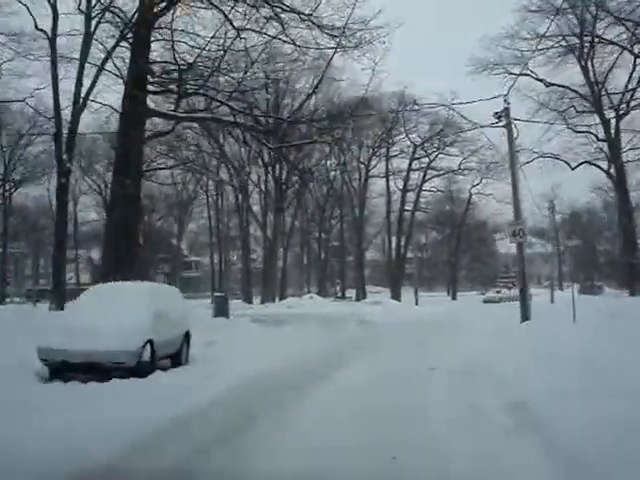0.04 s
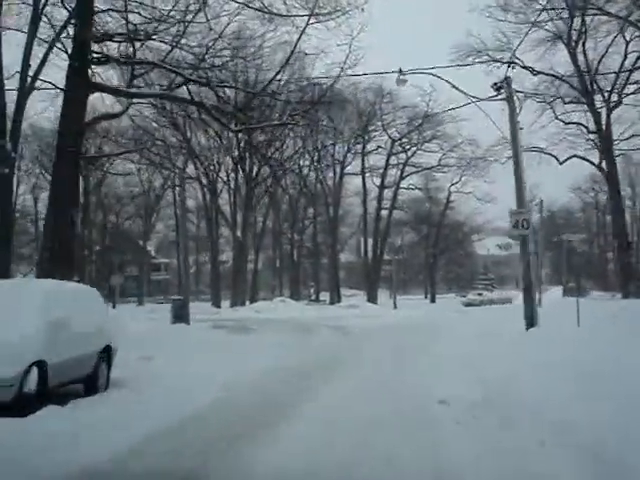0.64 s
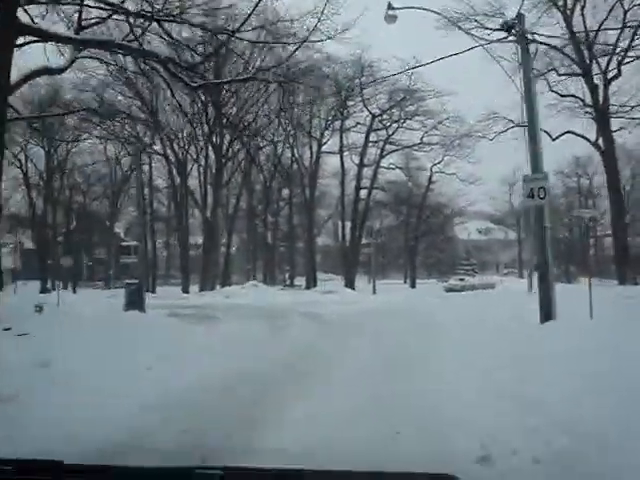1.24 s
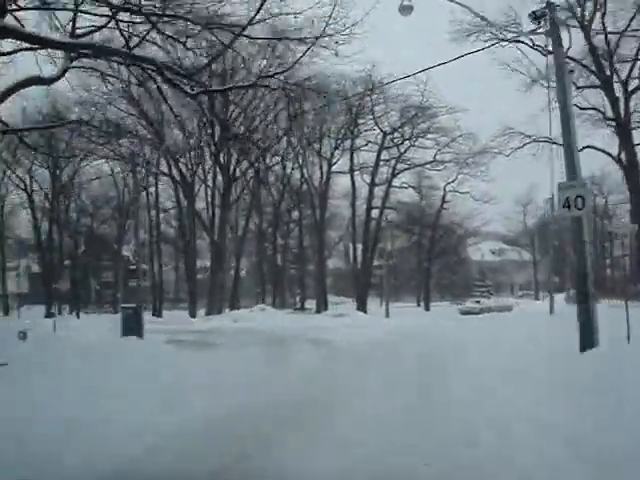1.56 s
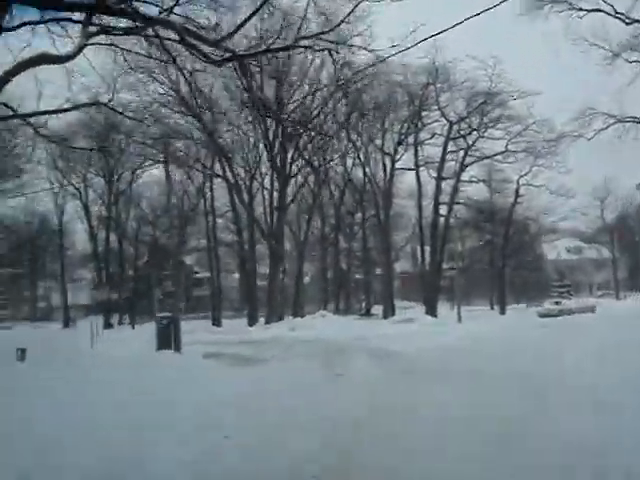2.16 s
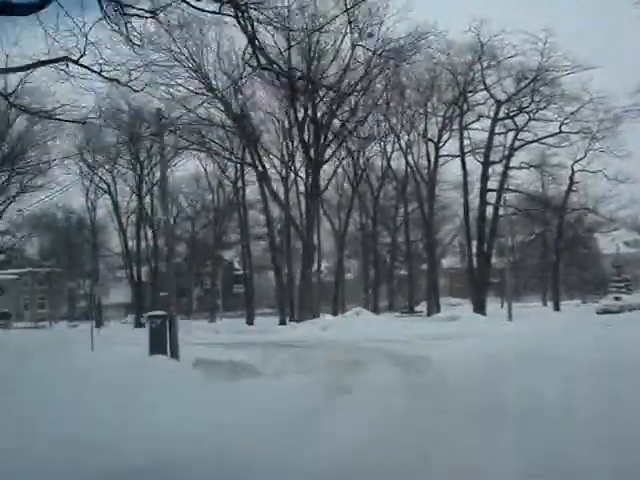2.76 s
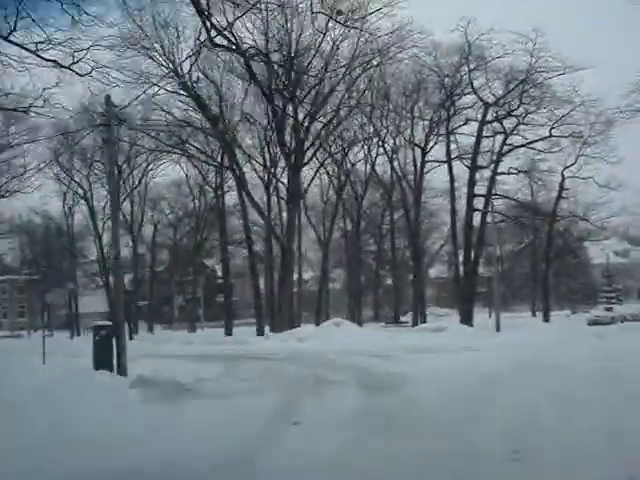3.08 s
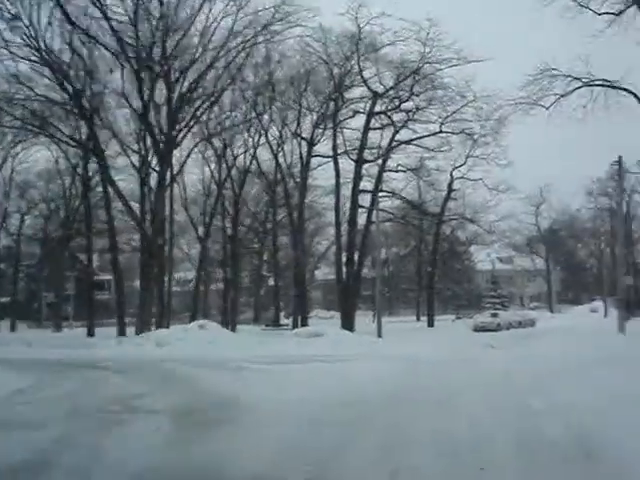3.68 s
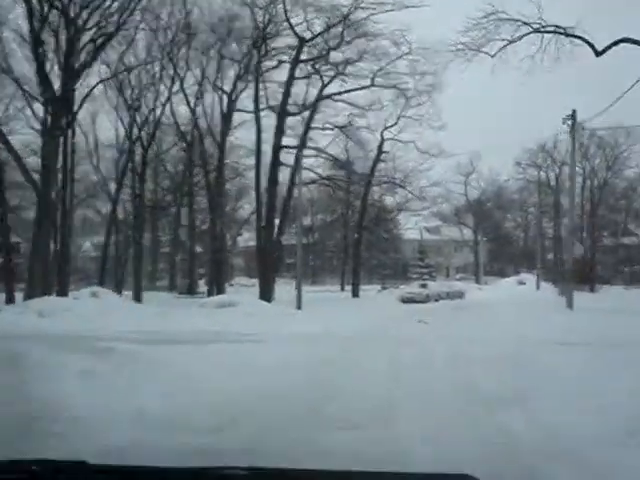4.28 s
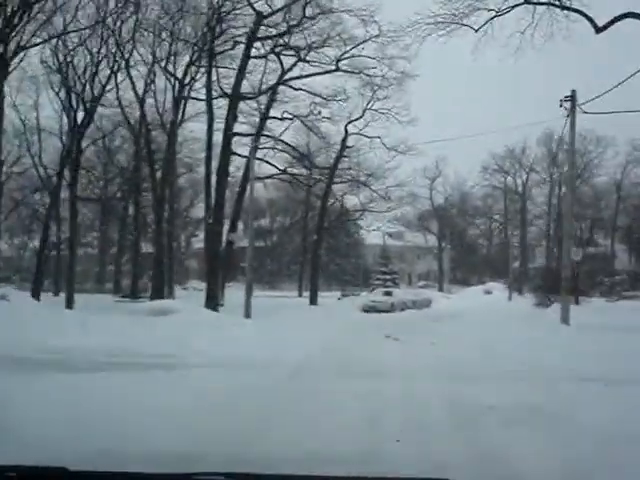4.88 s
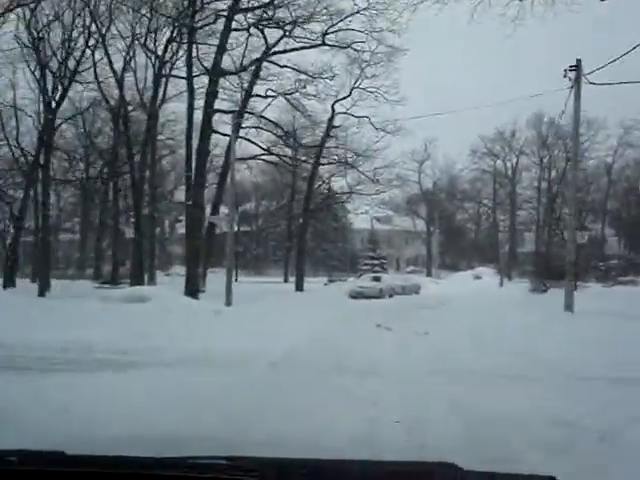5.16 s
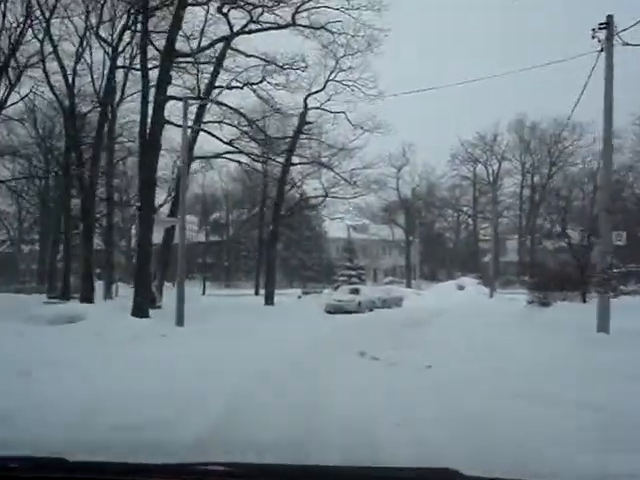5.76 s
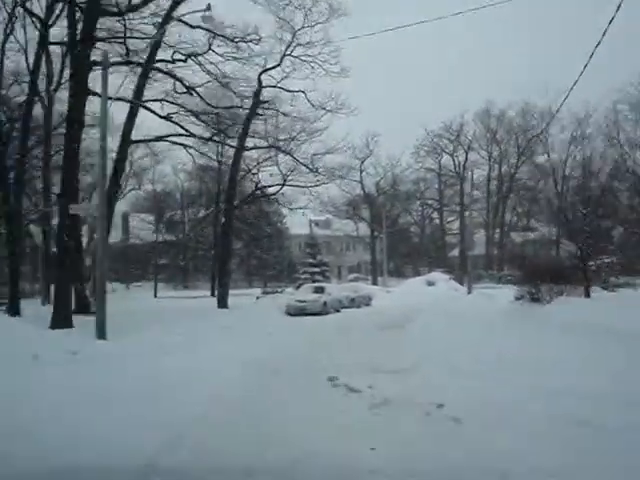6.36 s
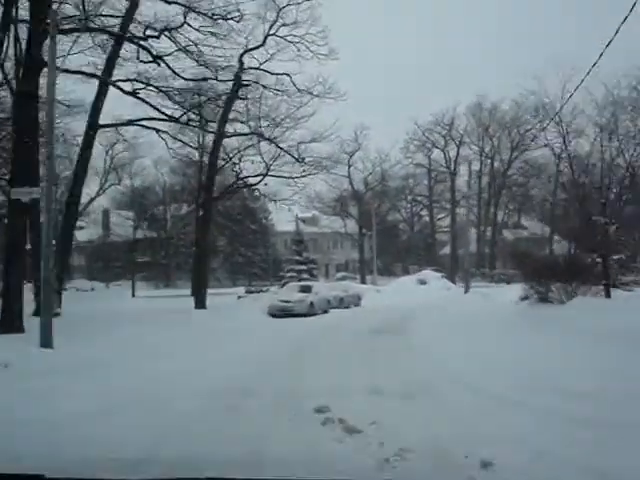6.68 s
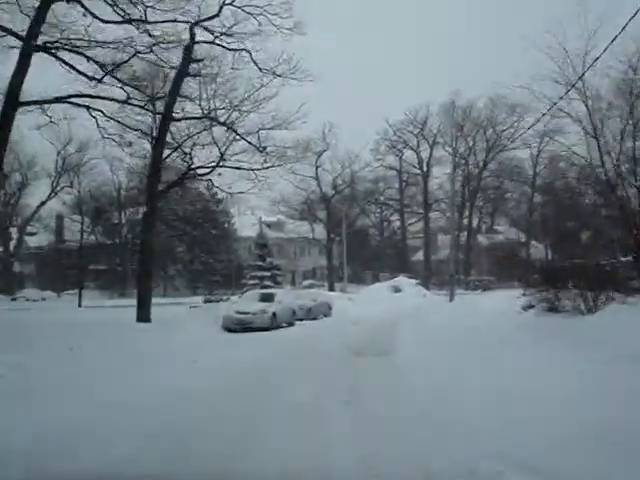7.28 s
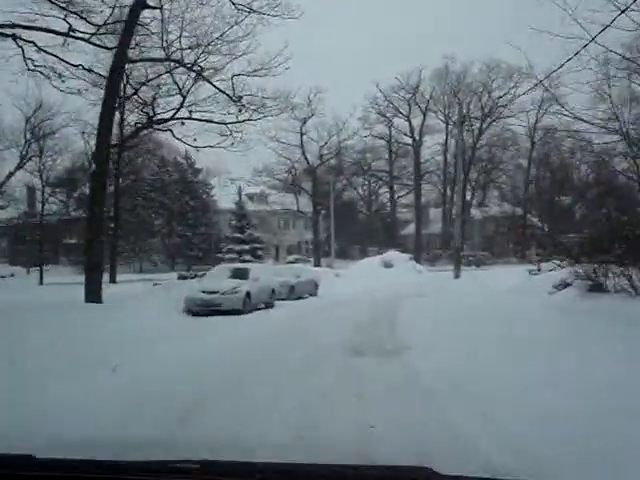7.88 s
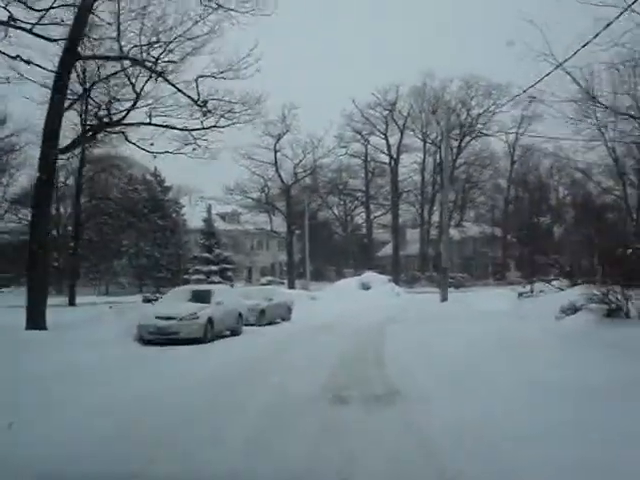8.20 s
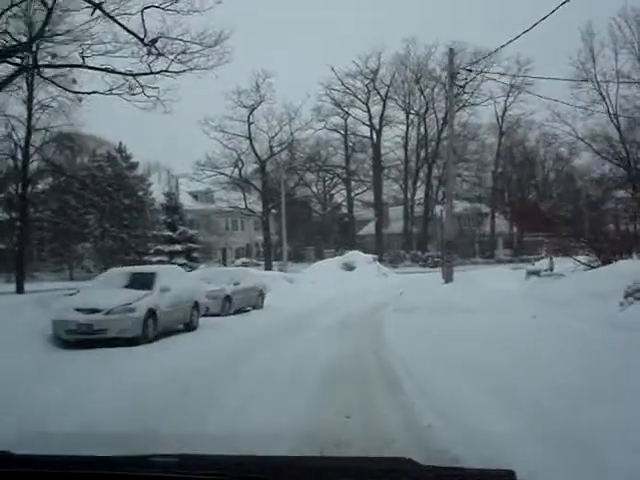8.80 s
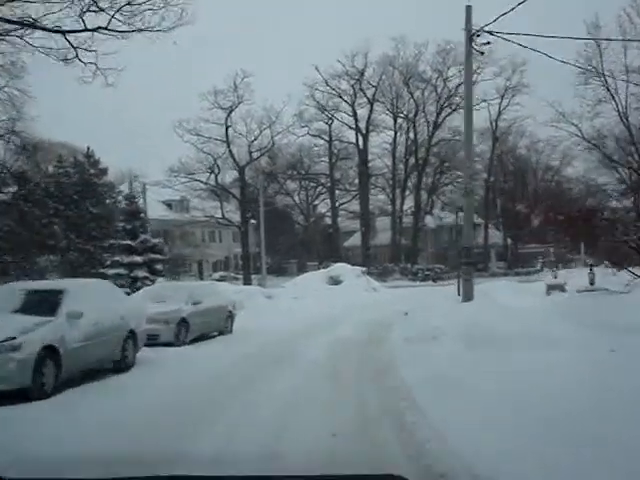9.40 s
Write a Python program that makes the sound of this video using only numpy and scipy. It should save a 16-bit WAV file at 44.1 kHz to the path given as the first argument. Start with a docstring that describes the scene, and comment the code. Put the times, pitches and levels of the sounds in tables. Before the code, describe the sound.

Heard from behind the windscreen, a car drives over packed snow with a continuous low tyre rumble, faint crunch and heater hiss. The engine's hum dips, rises as it pulls through a bend, then falls away as the driver eases off. Small plastic trim pieces tick throughout. Several runs of icy ruts knock the suspension, shake the body and set the trim rattling, with short gritty swishes of loose snow in between.

```python
"""Inside a car rolling through a bend on a snow-covered street.
The six-cylinder engine hums through the cabin's resonances as the driver eases off, pulls away
and eases off again. Tyres rumble and crunch on packed snow, their hiss merging with the heater fan's.
Loose trim ticks; icy ruts thump the suspension, shake the body and rattle the trim.
Loose snow sprays in the bend, and patches of it swish under the tyres."""
import sys
import numpy as np
from scipy.fft import rfft, irfft, next_fast_len
from scipy.io import wavfile
from scipy.ndimage import map_coordinates

SR = 44100
rng = np.random.default_rng(int(sys.argv[2]) if len(sys.argv) > 2 else 0)


def unload_wav(signal):
    """Save mono or channel-first audio to the path in sys.argv[1] as 16-bit WAV at rate SR, clipped to [-1, 1]."""
    wavfile.write(
        sys.argv[1],
        SR,
        np.round(np.clip(np.atleast_2d(signal).T, -1, 1) * 32767).astype(np.int16),
    )


N = 425124
TIME_S = np.arange(N) / SR


def amp(db):
    return 10 ** (np.asarray(db) / 20)


def unit_rms(x):
    return x / np.sqrt(np.mean(x ** 2) + 1e-20)


def curve(rows, t=TIME_S):
    """(t/s, value) rows interpolated at t."""
    return np.interp(t, *np.transpose(rows))


def wobble(rate_hz):
    """Smooth random curve, rate_hz knots a second."""
    knots = rng.standard_normal(int(N * rate_hz / SR) + 4)
    return map_coordinates(knots, [TIME_S * rate_hz])


def filtered(x, response):
    """x through the frequency response response(hz)."""
    size = next_fast_len(len(x) + SR // 2)
    return irfft(rfft(x, size) * response(np.fft.rfftfreq(size, 1 / SR)), size)[:len(x)]


def noise(spectrum):
    """Noise of rms 1, shaped by (f/Hz, level/dB) rows on a log frequency axis."""
    knot_hz, db = np.transpose(spectrum)
    response = lambda hz: amp(np.interp(np.log(hz + 1), np.log(knot_hz + 1), db))
    return unit_rms(filtered(rng.standard_normal(N), response))


def resonance(hz, centre_hz, width_hz):
    """Causal band-pass, gain 1 at its centre."""
    return 1j * hz * width_hz / (centre_hz ** 2 - hz ** 2 + 1j * hz * width_hz)


def add(track, start_s, sound):
    part = track[max(round(start_s * SR), 0):][:len(sound)]
    part += sound[:len(part)]


def fade(t, attack_s, t60_s):
    """Quick rise, exponential decay."""
    return (1 - np.exp(-t / attack_s)) * np.exp(-np.log(1000) * t / t60_s)


# engine load: t/s, level/dB
ENGINE_LOAD = [(0, -38), (2.2, -39), (2.6, -41), (3.7, -38.5), (4.8, -38.5), (6.6, -38), (7.5, -47.5),
               (9.64, -41)]
# exhaust pulse rate of one three-cylinder bank: t/s, f/Hz
PULSE_RATE = [(0, 30.3), (.5, 30.9), (1.27, 30.95), (2.29, 31.5), (2.71, 28.7), (3.28, 28.5), (3.6, 33.4),
              (4.49, 37.2), (4.87, 36), (6.1, 36.5), (6.46, 33.2), (6.8, 32.3), (7.8, 25.5), (8.4, 22.7),
              (9.64, 22.1)]
# engine-to-cabin resonances: f/Hz, width/Hz, level/dB
CABIN_PATHS = [(72.6, 15, -13.5), (96.3, 15, -2), (101.8, 12.4, 1), (117, 20, -0.5), (132.7, 9.7, -4.5),
               (147, 5.7, -15.5), (190.3, 28, -9), (219, 17.5, -7.5), (296.3, 39, -10.5),
               (340.7, 17.4, -10.5), (362.6, 10, -16.5), (432.5, 30, -14), (589, 18, -26.5), (690, 30, -22),
               (773, 32, -22.5), (876, 20, -27.5)]


def engine(jitter_rad=0.008, uneven_db=-7.5, floor_db=-37, waver_db=2, flutter_db=0.95):
    """Exhaust pulses excite the cabin; unequal cylinders add lines at thirds of the pulse rate."""
    pulse_hz = curve(PULSE_RATE) * (1 + 0.0007 * wobble(7))
    # early and late firings blur the high harmonics most
    phase = 2 * np.pi * np.cumsum(pulse_hz) / SR + jitter_rad * wobble(30)

    def harmonic(k):
        return np.sqrt(2) * np.sin(k * phase + 2 * np.pi * rng.random())

    def cabin(hz):
        peaks = sum(amp(db) * abs(resonance(hz, f, width)) ** 2 for f, width, db in CABIN_PATHS)
        return amp(floor_db) + peaks

    pulses = sum(harmonic(k) for k in range(2, 31) if k != 6)
    thirds = sum(harmonic(k / 3) for k in range(19, 60) if k % 3)
    hum = filtered(pulses + amp(uneven_db) * thirds, cabin)
    # the sixth harmonic booms near its own resonance
    boom = filtered(harmonic(6), lambda hz: abs(resonance(hz, centre_hz=186, width_hz=29.5)) ** 2)
    # a noisy boom fills the low cabin resonance, more at speed
    throb = filtered(rng.standard_normal(N), lambda hz: resonance(hz, centre_hz=111.7, width_hz=24) ** 2)
    throb = unit_rms(throb) * amp(-5.5 + 0.8 * (pulse_hz - pulse_hz.max()))
    hum *= amp(waver_db * wobble(4.7) + flutter_db * wobble(16))
    boom *= amp(waver_db * wobble(4.2))
    return amp(curve(ENGINE_LOAD)) * (hum + boom + throb)


# unevenness of the packed snow: t/s, level/dB
SNOW_ROUGHNESS = [(0, -3), (1.5, -1), (1.85, 1), (3.15, -2.5), (3.85, 3), (4.15, 0.8), (5.6, 0), (6.1, 2.5),
                  (6.35, 4), (6.85, 5), (7.5, 1.4), (8.25, 2.5), (8.6, 0), (9.64, -3)]
# tyre noise spectra, the hiss shared with the heater: f/Hz, level/dB
RUMBLE_SPECTRUM = [(10, -16.5), (17, -6), (23, 5.5), (33, -0.5), (45, -1.5), (60, -4), (74, 2), (100, -7.5),
                   (140, -12.5), (250, -66)]
ROAR_SPECTRUM = [(50, -20.5), (90, -1.5), (130, 1.5), (165, 1), (215, -2), (290, -4.5), (370, -7.5),
                 (470, -8), (590, -11.5), (700, -14), (820, -15), (1000, -21.5), (1400, -33), (3000, -65)]
CRUNCH_SPECTRUM = [(500, -18), (1000, 4), (1450, 2.5), (2050, 2), (2450, -1), (2900, -1), (3500, -5.5),
                   (5000, -14), (10000, -48.5)]
HISS_SPECTRUM = [(800, -16), (2500, -5.5), (4000, 1), (6000, 1.5), (8000, -1), (10000, -6), (12000, -59.5)]


def tyres_and_heater(spray_crunch_db=-58, spray_hiss_db=-55):
    """Uneven packed snow shakes the floor; its crunch and spray join the heater's hiss."""
    rough_db = curve(SNOW_ROUGHNESS)
    # the tyres plough through loose snow in the bend
    spray = curve([(3.15, 0), (3.51, 1), (4.51, 1), (5.43, 0)])
    lumps = wobble(22)
    rumble = amp(-36.5 + 1.2 * rough_db + wobble(4)) * noise(RUMBLE_SPECTRUM)
    roar = amp(-37.5 + 0.75 * rough_db + 0.77 * lumps) * noise(ROAR_SPECTRUM)
    crunch_gain = np.hypot(amp(-53.5 + 0.32 * rough_db), amp(spray_crunch_db) * spray)
    hiss_gain = np.hypot(amp(-57 + 0.18 * rough_db), amp(spray_hiss_db) * spray)
    crunch = crunch_gain * amp(0.92 * lumps + 0.7 * wobble(130)) * noise(CRUNCH_SPECTRUM)
    hiss = hiss_gain * amp(1.44 * wobble(65) - 0.2 * wobble(1.3)) * noise(HISS_SPECTRUM)
    return rumble + roar + crunch + hiss


# trim contacts: t/s, chatter/dB, ring/dB, f/Hz, edge over chatter/dB, t60/s
TRIM_TICKS = [(.094, -43, -43, 1410, -17, 0.055), (.120, -40, -36, 1960, -12, 0.049),
              (.5935, -36.5, -34, 2130, 0, .045), (.5995, -37.5, -27.5, 1600, -5, 0.05),
              (.603, -45, -34, 2050, -8, .04), (.872, -38.5, -34.5, 1970, -12, 0.044),
              (.909, -37.5, -35, 1430, -17, 0.051), (.997, -41.5, -38, 1720, -9, .07),
              (1.572, -43, -36, 1990, -15, 0.056), (1.702, -47, -43, 1900, -14, .05),
              (1.719, -47, -43, 2500, -14, .06), (1.765, -44, -43, 2390, -14.5, .07),
              (1.801, -40.5, -33, 1344, -11, .04), (1.83, -44, -35.5, 1460, -13.5, 0.042),
              (1.865, -45, -43, 1260, -10, 0.055), (1.888, -50, -41, 2680, -12, 0.081),
              (1.99, -51, -42, 2460, -17, .05), (2.11, -47, -55, 3500, 5, .008),
              (2.237, -51, -32, 1230, -19, 0.039), (2.261, -51, -37.5, 1980, -18, 0.055),
              (2.362, -45.5, -45, 1510, -16, .05), (3.245, -43.5, -45, 1510, -13, 0.15),
              (3.306, -37.5, -34, 1120, -8, .045), (3.364, -42, -34, 1940, -15.5, 0.054),
              (3.488, -52, -36, 1475, -14, .05), (3.908, -51, -38, 1404, -14, 0.049),
              (3.971, -39, -37, 3000, 0, 0.07), (4.38, -42.5, -43, 2400, -4, 0.065),
              (4.812, -44.5, -45, 2470, -7, 0.054), (4.858, -43, -45, 1920, -10, .06),
              (5.058, -45, -40, 3920, -1, 0.065), (5.116, -44, -44, 2200, -2, 0.035),
              (5.147, -46, -43, 2280, -6, 0.049), (6.545, -41.5, -35, 1135, -9.5, .05),
              (6.749, -45, -42, 2000, -10, .05), (6.787, -48, -39, 1560, -12, .08),
              (6.802, -45, -39, 1750, -12, .05), (6.857, -46, -44, 2300, -4, .05),
              (6.909, -46, -44, 2100, -6, .03), (6.951, -39, -38, 1840, -3, .04),
              (6.974, -42, -43, 2400, -1, .04), (6.989, -42, -44, 1830, -2.5, 0.062),
              (7.411, -40.5, -38, 1700, -19, 0.07), (7.4655, -43, -52, 4000, 3, .006),
              (7.4815, -41, -42, 2000, -8, .008), (8.479, -43, -39, 2060, -10, .05),
              (8.524, -38.5, -36, 2730, -13.5, .055), (8.8255, -38.5, -37, 2060, -14, .035),
              (9.174, -43.5, -43, 1400, -9.5, .067), (9.321, -46, -38, 3140, 2, 0.041),
              (9.538, -43, -42, 2200, -14, 0.05)]
# modes of a trim piece: frequency ratio, level/dB, t60 ratio
TRIM_MODES = [(1, -.5, .85), (1.28, -6.5, .77), (2.2, -14, .54)]
# spectra of the chatter and its sharp edge: f/Hz, level/dB
CHATTER_SPECTRUM = [(500, -21), (1100, 2.5), (1700, -0.5), (3200, -4), (4500, -12.5), (9000, -22)]
EDGE_SPECTRUM = [(2000, -23.5), (4500, 3), (7500, -10.5), (10000, -4)]


def loose_trim(contacts, gain_db=-1, buzz_rad=0.05, crack_db=-1, crack_t60_s=0.007):
    """Loose plastic cracks on contact, chatters and rings; the buzzing contact blurs the pitch."""
    t = np.arange(SR // 6) / SR
    ring, chatter_env, edge_env = np.zeros((3, N))
    for start_s, chatter_db, ring_db, hz, edge_db, t60_s in contacts:
        for hz_ratio, mode_db, t60_ratio in TRIM_MODES:
            phase = 2 * np.pi * hz * hz_ratio * t + buzz_rad * np.cumsum(rng.standard_normal(len(t)))
            mode = fade(t, 0.0017, t60_ratio * t60_s) * np.sin(phase)
            add(ring, start_s, amp(ring_db + mode_db) * mode)
        crack = amp(crack_db - 60 * t / crack_t60_s)
        burst = amp(chatter_db) * (fade(t, 0.0012, t60_s) + crack)
        add(chatter_env, start_s, burst)
        add(edge_env, start_s, amp(edge_db) * burst)
    ticks = amp(gain_db) * (ring + chatter_env * noise(CHATTER_SPECTRUM))
    return ticks + edge_env * noise(EDGE_SPECTRUM)


def snow_lumps(count=16, thump_db=-35.5, clatter_db=-37.5):
    """Small random lumps hit harder on rough snow; rows as in ICY_RUTS."""
    times_s = (np.arange(count) + rng.random(count)) / count * N / SR
    rough_db = curve(SNOW_ROUGHNESS, times_s)
    return zip(times_s, thump_db + rough_db, clatter_db + rough_db)


def struck(modes, t, attack_s, scatter_db=1.5, detune=0.041):
    """One blow on a set of modes, peak 1; neighbours start opposed, so it builds over a few ms."""
    ring = np.zeros(len(t))
    for k, (hz, db, t60_s) in enumerate(modes):
        gain = (-1) ** k * amp(db + scatter_db * rng.normal())
        mode_hz = hz * (1 + detune * rng.normal())
        ring += gain * fade(t, attack_s, t60_s) * np.sin(2 * np.pi * mode_hz * t)
    return ring / abs(ring).max()


# deeper ruts: t/s, thump/dB, clatter/dB
ICY_RUTS = [(1.735, -21, -29), (1.755, -21, -29), (1.793, -18.5, -39), (2.098, -33, -44), (2.232, -33, -28),
            (3.307, -22.5, -26.5), (3.345, -23, -39), (3.485, -16, -32.5), (3.579, -16, -29),
            (3.682, -20.5, -29.5), (3.706, -28, -28.5), (3.732, -20.5, -23), (3.749, -26.5, -27.5),
            (3.771, -27, -35), (3.804, -23, -37), (3.818, -14, -26.5), (3.834, -16, -26.5),
            (3.847, -10.5, -31), (3.859, -15, -25), (3.906, -8.5, -20.5), (3.923, -16, -26.5),
            (3.943, -20, -27.5), (4.028, -31, -32.5), (4.132, -23.5, -33), (4.263, -25, -25.5),
            (4.295, -33, -28.5), (4.537, -18, -29.5), (4.579, -33, -33), (6.335, -14.5, -40),
            (6.37, -20.5, -37), (6.408, -18.5, -30), (6.46, -23.5, -38), (6.54, -24, -33),
            (6.563, -17, -32.5), (6.594, -17, -31), (6.652, -22, -42), (6.7, -22, -39), (6.762, -24.5, -27),
            (6.955, -27, -28), (6.99, -23, -29), (7.13, -18, -34), (7.818, -18.5, -28.5), (7.86, -7, -28),
            (7.891, -9, -24.5), (7.902, -15.5, -21.5), (7.928, -16, -32.5), (7.952, -19.5, -41),
            (8.075, -26, -44), (8.116, -17.5, -37), (8.227, -20, -27), (8.241, -24.5, -28.5),
            (8.322, -18, -32.5), (8.346, -27.5, -37.5), (8.37, -32, -34), (8.548, -22.5, -44),
            (9.227, -17.5, -41)]
# modes of body panels and cabin air, then of strut and wheel arch: f/Hz, level/dB, t60/s
BODY_MODES = [(106.2, -5, 0.12), (136, -1.5, 0.088), (187.6, 3.5, 0.096), (229.3, -3, 0.12),
              (261, -2, 0.11), (308, -5, 0.065), (379, -11, 0.06), (465, -21.5, 0.032)]
SUSPENSION_MODES = [(397, 0.5, 0.084), (513.6, 0.5, 0.077), (678, -2.5, 0.085), (818, -7, 0.071),
                    (1436, -16, 0.085)]
# spectra of body shudder and suspension clatter: f/Hz, level/dB
SHUDDER_SPECTRUM = [(40, -21), (100, 5), (190, -5.5), (270, 0.5), (450, -17), (700, -30), (1400, -44),
                    (4000, -44)]
CLATTER_SPECTRUM = [(180, -23), (330, 14.5), (430, 9), (520, 7), (590, -8), (700, -0.5), (820, -8.5),
                    (1050, -16.5), (1430, -18), (1800, -22), (4000, -27), (10000, -45.5)]


def ruts_and_lumps():
    """Each blow rings and shakes the body; the suspension clunks and clatters, the wheel hops."""
    t = np.arange(SR // 3) / SR
    ring, shudder_power, clatter_power, hop_power = np.zeros((4, N))
    for start_s, thump_db, clatter_db in [*ICY_RUTS, *snow_lumps()]:
        add(ring, start_s, amp(thump_db - 2) * struck(BODY_MODES, t, attack_s=0.0019))
        add(ring, start_s, amp(clatter_db) * struck(SUSPENSION_MODES, t, attack_s=0.0012))
        add(shudder_power, start_s, (amp(thump_db - 16) * fade(t, 0.0033, t60_s=0.15)) ** 2)
        add(clatter_power, start_s, (amp(clatter_db - 3.5) * fade(t, 0.0037, t60_s=0.13)) ** 2)
        add(hop_power, start_s, (amp(thump_db - 25) * fade(t, 0.018, t60_s=0.93)) ** 2)
    shudder = np.sqrt(shudder_power) * noise(SHUDDER_SPECTRUM)
    clatter = np.sqrt(clatter_power) * noise(CLATTER_SPECTRUM)
    hop = np.sqrt(hop_power) * noise(RUMBLE_SPECTRUM)
    return ring + shudder + clatter + hop


def rattles(bounces=2, gap_s=0.044, loss_db=8, centre_hz=1946, spread=0.28, edge_db=-11.5, t60_s=0.055):
    """Each rut bounces a trim piece, weaker at each contact; rows as in TRIM_TICKS."""
    contacts = [(rut_s + gap_s * (k + rng.random()), clatter_db - 24.5 - loss_db * k)
                for rut_s, _, clatter_db in ICY_RUTS for k in range(bounces)]
    return [(start_s, db, db + 3.5, centre_hz * np.exp(spread * rng.normal()), edge_db, t60_s)
            for start_s, db in contacts]


# loose or crusted snow: centre t/s, length/s, crunch/dB, hiss/dB
SNOW_PATCHES = [(3.588, 0.18, -50.5, -55), (4.326, 0.19, -52, -55), (4.834, .12, -58, -59.5),
                (5.097, 0.1, -66, -54.5), (6.038, 0.17, -55, -54.5), (6.814, 0.1, -51, -57.5),
                (6.972, .1, -56, -60), (7.433, 0.053, -59, -71.5), (8.254, .12, -51.5, -56.5),
                (8.786, 0.17, -60.5, -59)]


def snow_patches(grain_db=2):
    """Each patch under the tyres swells into a brief gritty swish."""
    crunch_env, hiss_env = np.zeros((2, N))
    for centre_s, length_s, crunch_db, hiss_db in SNOW_PATCHES:
        swell = np.exp(-(2 * (TIME_S - centre_s) / length_s) ** 2)
        crunch_env += amp(crunch_db) * swell
        hiss_env += amp(hiss_db) * swell
    grain = amp(grain_db * wobble(170))
    return grain * (crunch_env * noise(CRUNCH_SPECTRUM) + hiss_env * noise(HISS_SPECTRUM))


def scene():
    """Mono mix behind the windscreen."""
    driving = engine() + tyres_and_heater() + snow_patches() + ruts_and_lumps()
    trim = loose_trim([*TRIM_TICKS, *rattles()])
    return (driving + trim)[None]


def record(dry):
    """Brick-wall low-pass."""
    cutoff_hz = 10230
    return np.array([filtered(channel, lambda hz: hz < cutoff_hz) for channel in dry])


dry = scene()
out = record(dry)
unload_wav(out)
```